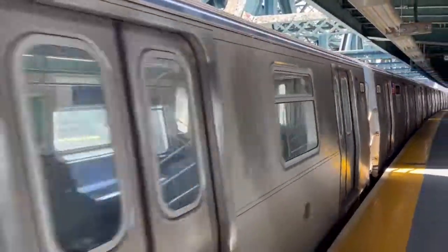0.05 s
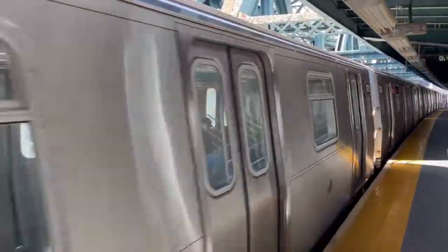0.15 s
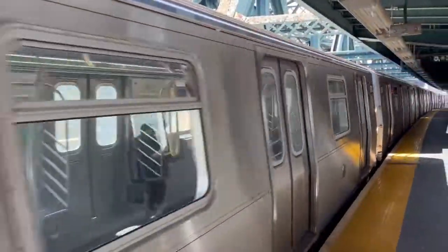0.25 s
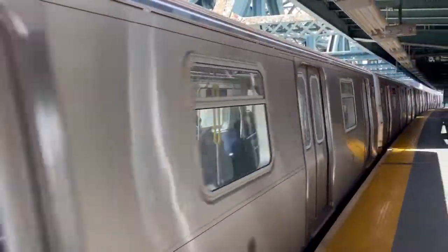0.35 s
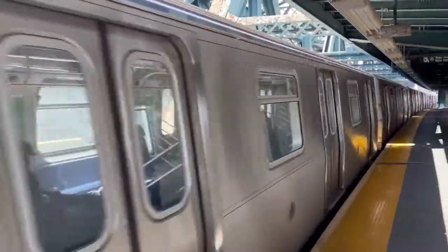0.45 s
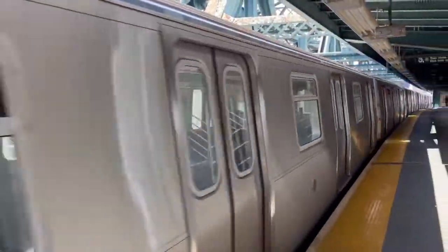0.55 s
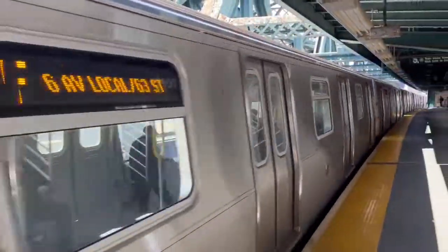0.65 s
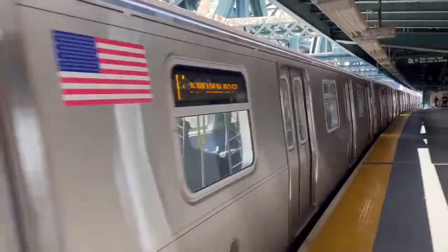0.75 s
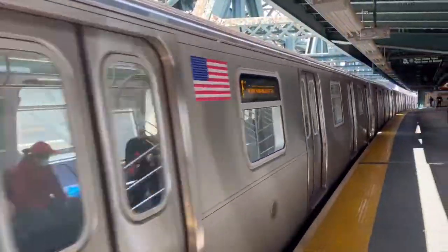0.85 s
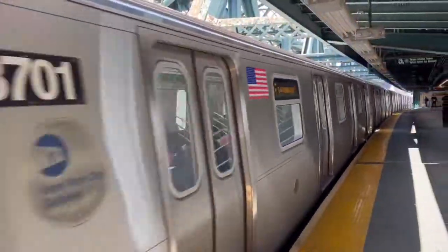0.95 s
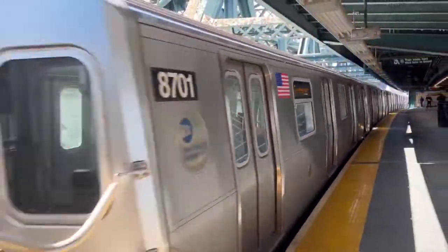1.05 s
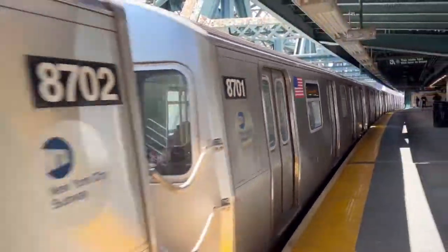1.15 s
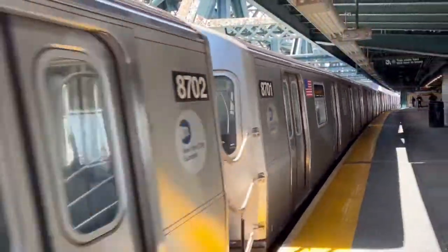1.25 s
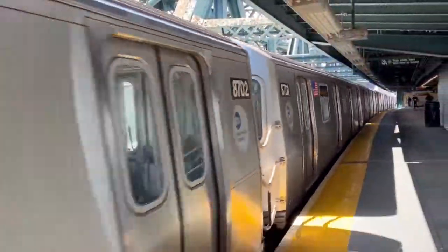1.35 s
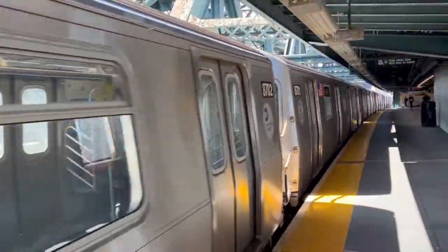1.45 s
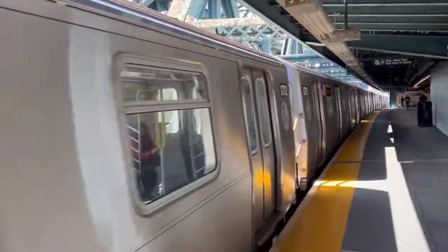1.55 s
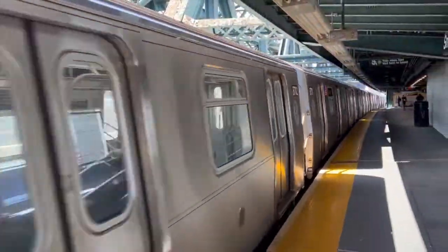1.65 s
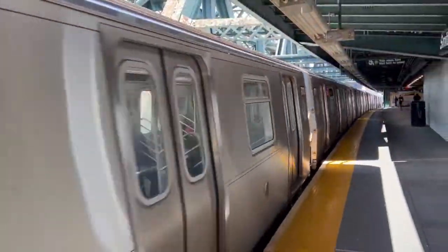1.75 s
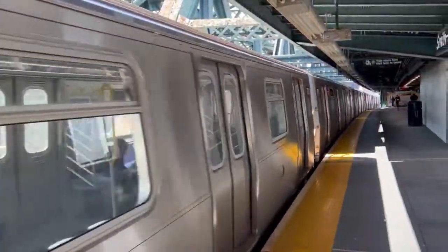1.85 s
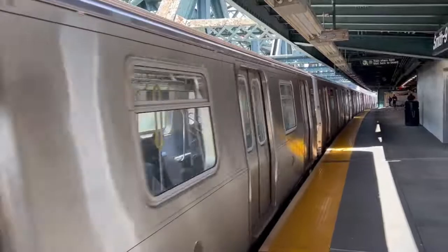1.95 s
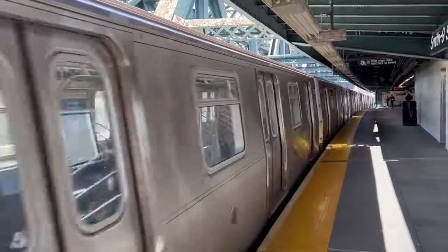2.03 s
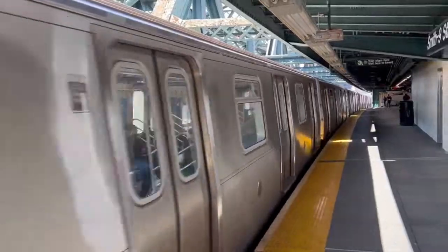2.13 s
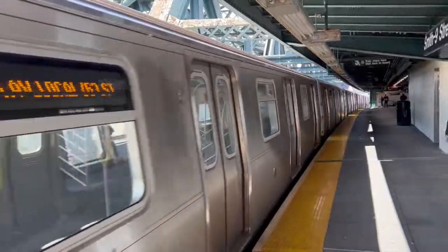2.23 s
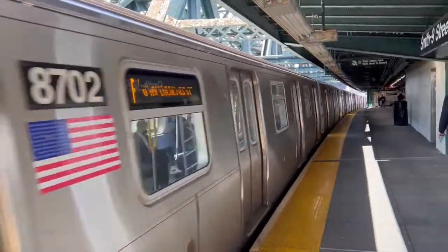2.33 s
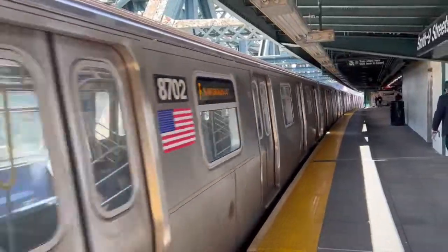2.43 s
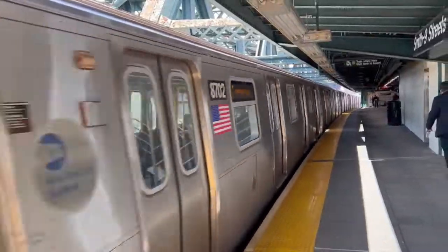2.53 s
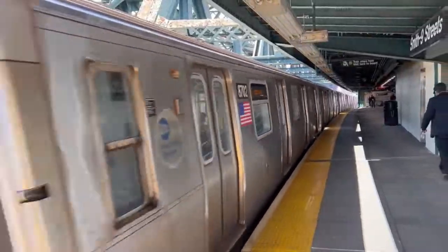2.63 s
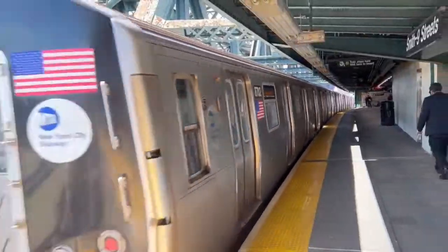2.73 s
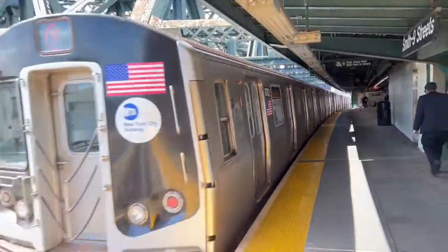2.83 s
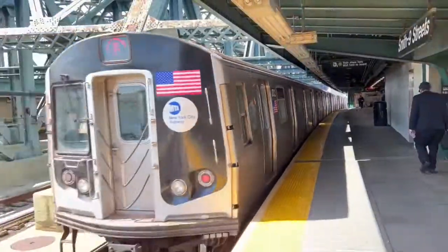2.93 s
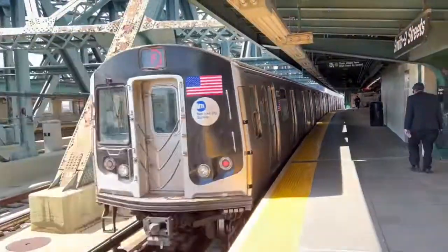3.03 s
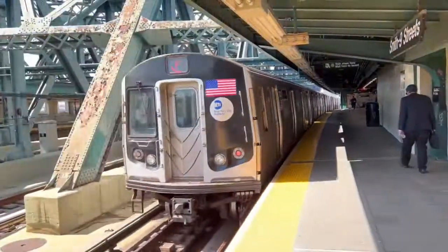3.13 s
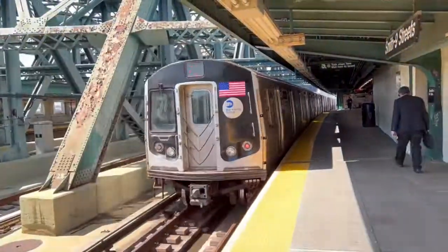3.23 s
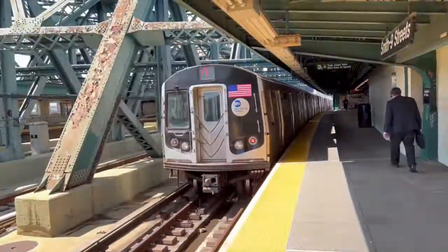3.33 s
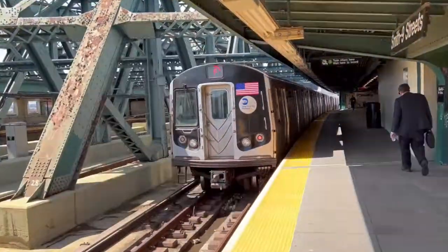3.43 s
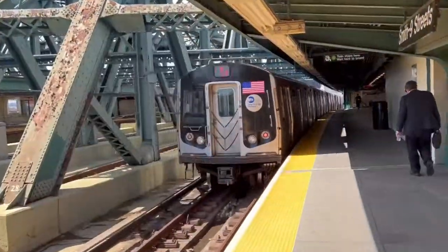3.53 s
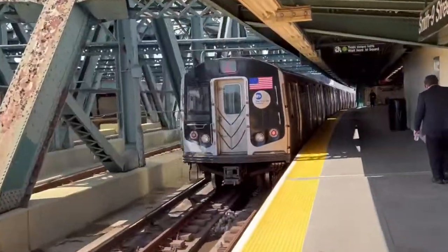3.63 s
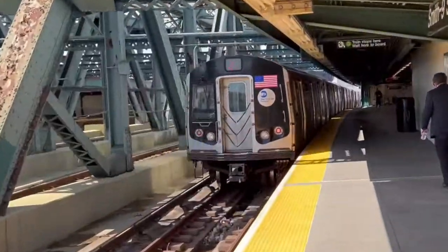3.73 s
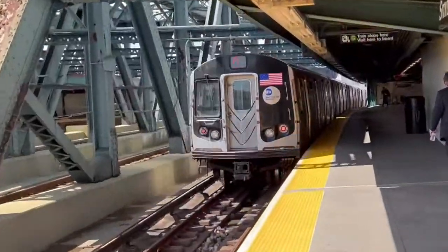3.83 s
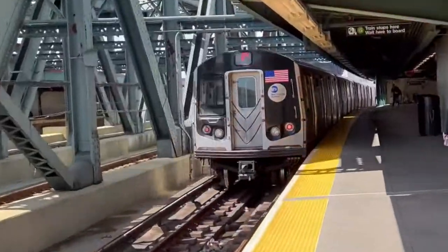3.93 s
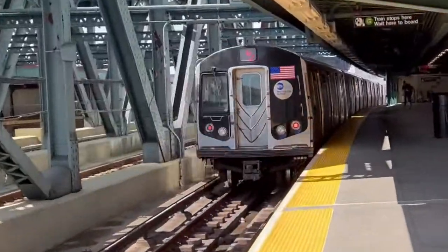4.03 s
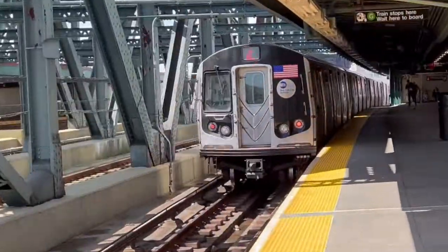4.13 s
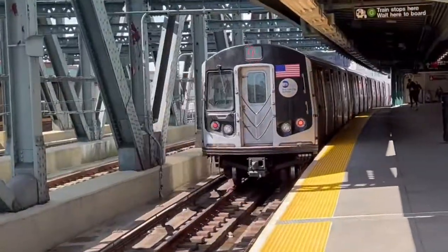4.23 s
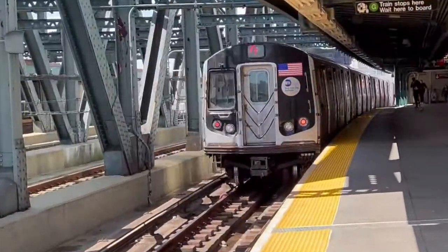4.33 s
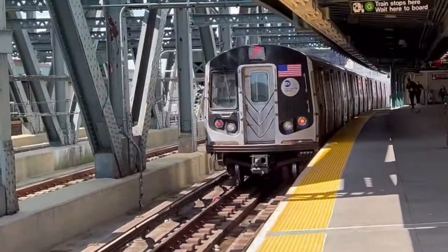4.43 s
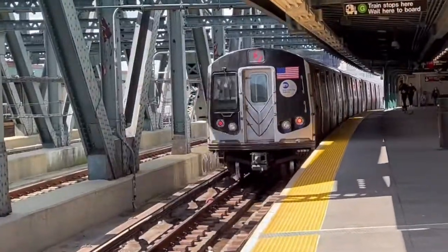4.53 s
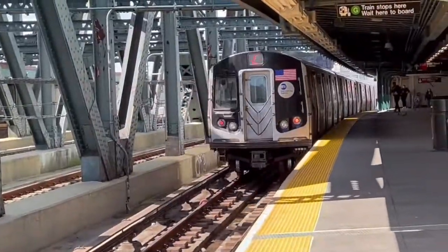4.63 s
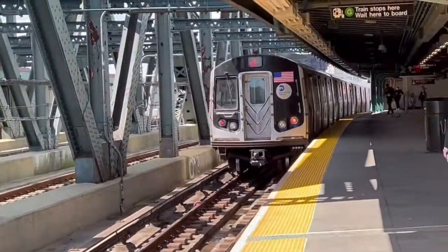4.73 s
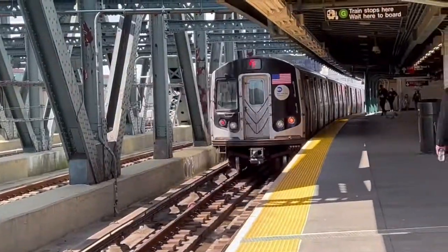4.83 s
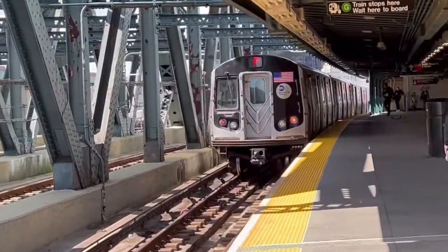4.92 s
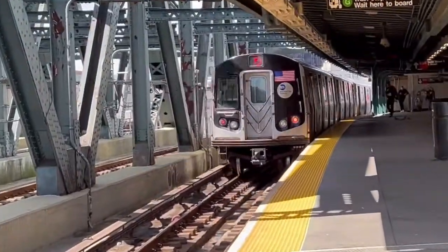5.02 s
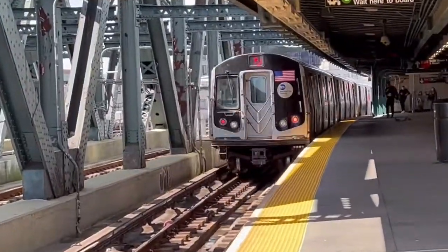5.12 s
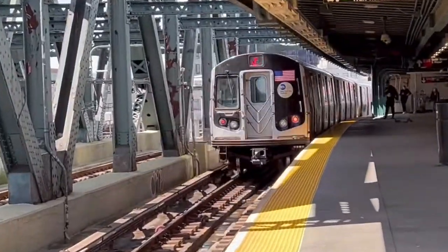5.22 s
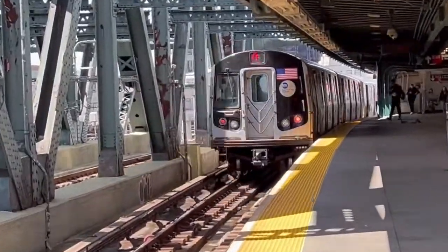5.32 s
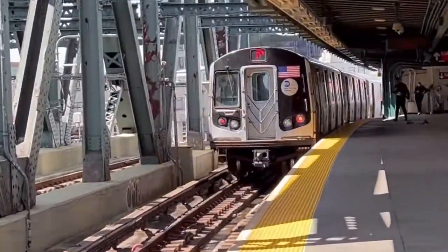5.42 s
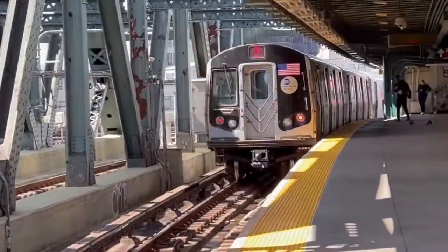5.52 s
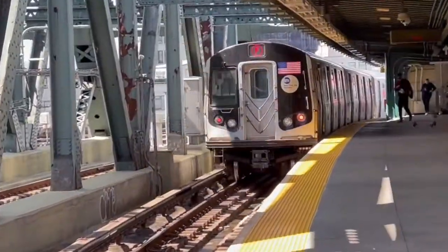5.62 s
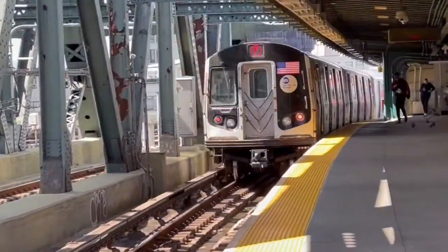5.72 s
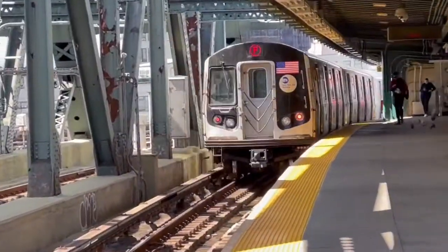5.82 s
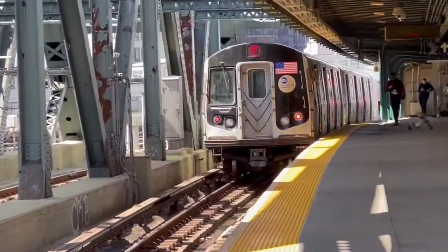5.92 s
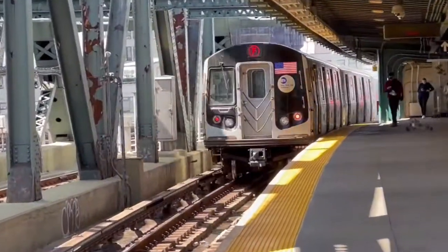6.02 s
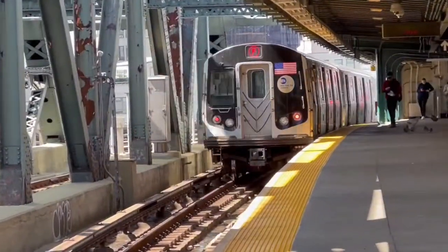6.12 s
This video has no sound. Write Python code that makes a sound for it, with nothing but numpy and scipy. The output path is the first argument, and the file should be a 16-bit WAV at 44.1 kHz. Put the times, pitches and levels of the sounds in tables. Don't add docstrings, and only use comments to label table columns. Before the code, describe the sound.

A metro train rolls closely past a roofed platform on an iron viaduct. Rough wheel roar, booming girders and quick joint knocks fill three seconds, with motor whine and thin flange squeals. As the tail clears, dragged air thumps the phone microphone; the roar falls away, leaving faint squeals and a few distant clanks over a returning low rumble.

```python
import sys
import numpy as np
from scipy import signal
from scipy.fft import rfft, irfft
from scipy.io import wavfile
from scipy.ndimage import uniform_filter1d

SR = 44100
rng = np.random.default_rng(int(sys.argv[2]) if len(sys.argv) > 2 else 0)


def digitize_waveform(pressure):
    field = np.atleast_2d(pressure).T
    bounded = np.clip(field, -1, 1)
    quanta = np.round(bounded * 32767).astype(np.int16)
    wavfile.write(sys.argv[1], SR, quanta)


def boost_factor(decibels):
    exponent = np.asarray(decibels, float) / 20
    return 10 ** exponent


N = 272097
TICK = 44
TIME = np.arange(N // TICK + 2) * TICK / SR
HZ = np.fft.rfftfreq(N, 1 / SR) + 1e-3


def on_log(table, hz):
    table_hz, values = np.transpose(table)
    return np.interp(np.log(hz), np.log(table_hz), values)


def full(curve):
    return np.interp(np.arange(N) / SR, TIME, curve)


def walk(rate):
    k = int(SR / TICK / rate)
    steps = np.repeat(rng.standard_normal(250), k)[:len(TIME)]
    return 1.304 * uniform_filter1d(uniform_filter1d(steps, k), k)


def noise(shape):
    spec = rfft(rng.standard_normal((2, N))) * shape
    return irfft(spec, N) / np.sqrt(np.mean(shape ** 2))


def bell(hz, width):
    return 1 / np.sqrt(1 + (2 * (HZ - hz) / width) ** 2)


def hold(start, length, rise, fall):
    rising = (TIME - start) / rise
    falling = (start + length - TIME) / fall
    return np.clip(np.minimum(rising, falling), 0, 1)


def knock(s, rise, t60):
    age = np.maximum(TIME - s, 0)
    return (1 - np.exp(-age / rise)) ** 2 * boost_factor(-120 * (age / t60) ** 1.215)


def push(at, peak_db, hz, cycles, lag):
    turns = (np.arange(N) / SR - at - np.array([[0], [lag]])) * hz
    return boost_factor(peak_db) * np.cos(2 * np.pi * turns) * np.exp(-(turns / cycles) ** 2)


def rings(table, rise, fall, trim_db):
    out, t = np.zeros((2, N)), np.arange(N) / SR
    part = 0.45 * np.array([[0], [1]])
    for (s, db, hz), turn in zip(table, rng.random((len(table), 2, 1))):
        near = slice(max(int((s - .15) * SR), 0), int((s + .2) * SR))
        age = t[near] - s
        swell = np.exp(-(age / np.where(age < 0, rise, fall)) ** 2 / 2)
        turns = hz * age + turn[0] + part * (turn - .5)
        out[:, near] += boost_factor(db + trim_db) * swell * np.sin(2 * np.pi * turns)
    return out


# time_s, wheel_roar_db, viaduct_shake_db
ROLL = [(0.0, -26.5, -22), (0.3, -26.5, -24.5), (0.62, -26.5, -24), (0.9, -28.5, -24.5),
        (1.5, -27.5, -25.5), (1.94, -27, -24), (2.56, -30, -30), (2.94, -29, -25.5), (3.44, -30.5, -21.5),
        (3.8, -34, -34), (4.16, -37, -43), (4.4, -38, -42), (4.64, -40.5, -31), (5.0, -39.5, -31),
        (5.2, -38.5, -29.5), (5.74, -42, -35), (6.17, -41, -23.5)]


def rolling():
    s, roar, girders = np.transpose(ROLL)
    roar = np.interp(TIME, s, roar)
    change = roar - -27
    bodies = -22.5 + 0.67 * change
    hiss = -39.5 + 0.37 * change - 2.5 * np.minimum(TIME, 3.62)
    return np.array([np.interp(TIME, s, girders), bodies, roar, hiss])


def rattle():
    ticks = rng.exponential(1, len(TIME)) * (rng.random(len(TIME)) < .04)
    return 1.3 * signal.lfilter([1], [1, -.85], ticks - ticks.mean())


# pitch_hz, level_db per Hz
STEEL = [(28, -33), (45, -4.5), (70, -4.5), (150, -5.5), (330, -6.5), (500, -11.5), (1000, -19),
         (2000, -26.5), (3100, -32.5), (3900, -36), (6000, -42.5), (9000, -45.5), (12000, -52.5),
         (15000, -59), (15250, -69), (15700, -70)]
# pitch_hz, width_hz, level_db over the roar
RINGS = [(62, 25, 3), (95, 22, -4), (117, 22, 5), (200, 35, 5), (338, 50, 8), (590, 90, 2), (1130, 120, 2),
         (1650, 150, 2), (2000, 220, 4), (2650, 200, 4), (2950, 250, 4), (3380, 280, 3.5), (4950, 300, 4),
         (5900, 500, 4)]


def steel_colour():
    colour = boost_factor(on_log(STEEL, HZ))
    for hz, width, db in RINGS:
        colour = colour * (1 + (boost_factor(db) - 1) * bell(hz, width) ** 2)
    return colour


def blend(levels, place):
    low = min(int(place), 3)
    return levels[low] + (place - low) * (levels[low + 1] - levels[low])


# pitch_hz, time_to_fade_60_db_s
JOINT_T60 = [(100, 0.13), (400, 0.61), (2000, 0.46), (6000, 0.37), (13000, 0.16)]
# start_s, roar_peak_db, boom_db, hiss_db, clank_hz
JOINTS = [(0.0, -15.5, -7.5, -34, 920), (0.181, -15.5, -10, -30.5, 902), (0.419, -16.5, -10.5, -42, 1063),
          (0.597, -21, -10.5, -32, 910), (0.841, -14.5, -12, -34, 837), (1.019, -19, -11.5, -33, 878),
          (1.206, -19, -7.5, -34, 734), (1.382, -16.5, -10.5, -26.5, 962), (1.645, -19, -12, -34.5, 877),
          (1.826, -21, -8, -31.5, 780), (2.055, -24, -12, -39, 790), (2.23, -20.5, -18, -35, 2026),
          (2.729, -20, -32, -49, 940), (2.822, -15, -14.5, -32.5, 946), (2.998, -13, -12, -30.5, 790),
          (4.279, -35, -18, -66, 940), (4.858, -29, -20.5, -37, 1174), (5.031, -24.5, -20, -35, 1177),
          (5.56, -29, -22.5, -49, 1993), (5.919, -38, -28, -48, 1420), (6.086, -27.5, -23, -52, 843)]


def joint_power(hz, place, zone_db):
    power, t60 = 0, on_log(JOINT_T60, hz)
    for t, roar, boom, hiss, _ in JOINTS:
        top = hiss - 19.5 - 4 * (t > 3.5)
        db = blend(np.array([boom - 12, boom - 10, roar - 7.5, hiss - 4, top + 1.7]) - zone_db, place)
        echoes = knock(t, 0.01, t60)
        crack = 1.2 * knock(t, 0.00038, 0.04)
        power = power + boost_factor(2 * db) * (echoes + crack)
    return power


# start_s, top_peak_db, hiss_db
ZINGS = [(.1775, -52, -50), (.31, -51, -43), (.47, -52, -46), (.66, -55, -55), (1.3823, -52, -50),
         (1.8138, -53, -50), (1.89, -51, -43), (1.94, -56, -38), (2.1, -56, -52), (2.2, -56, -55),
         (2.7257, -62, -55), (2.8135, -56, -55), (2.9981, -54, -50), (1.538, -52, -35), (2.2967, -52, -49),
         (3.278, -57, -50), (3.454, -52.5, -43.5), (3.693, -53, -44), (3.8636, -50, -45),
         (4.8055, -57, -48), (4.9686, -52.5, -44)]


def zing_power(place, zone_db):
    power = 0
    for t, top, hiss in ZINGS:
        db = blend(np.array([-120, -120, hiss - 22, hiss - 3, top + 1.3]) - zone_db, place)
        power = power + boost_factor(2 * db) * (knock(t, 0.011, 0.45) + 1.3 * knock(t, .0006, .04))
    return power


# low_hz, high_hz
ZONES = [(35, 140), (160, 500), (700, 3500), (4500, 8500), (11000, 15000)]


def wheels():
    colour = steel_colour()
    zone_power = [np.sum(colour[(HZ > lo) & (HZ < hi)] ** 2) / len(HZ) for lo, hi in ZONES]
    zone_db = 10 * np.log10(zone_power)
    centres = np.log([np.sqrt(lo * hi) for lo, hi in ZONES])
    roll = rolling() - zone_db[:4, None]
    roll = np.vstack([roll, roll[3] - 1 - 0.68 * TIME])
    spec = rfft(rng.standard_normal((2, N))) * colour
    out, shake, chatter = 0, walk(9), rattle()
    spacing = .45
    for k in np.arange(-11, 10):
        hz = 1000 * 2 ** (k * spacing)
        place = np.interp(np.log(hz), centres, np.arange(5))
        treble = max(place - 2, 0)
        flutter = 1.35 * walk(14) / max(place - 2, 1)
        power = boost_factor(2 * (blend(roll, place) + 0.89 * shake + flutter + treble / 2 * chatter))
        power = power + joint_power(hz, place, zone_db) + zing_power(place, zone_db)
        window = np.cos(np.pi / 2 * np.clip(np.log2(HZ / hz) / spacing, -1, 1)) ** 2
        out = out + full(np.sqrt(power)) * irfft(spec * window, N)
    return out


# pitch_hz, level_db, time_to_fade_60_db_s
THUD = [(150, -4, .2), (203, 1, .3), (265, -3, .16), (335, 0, .24), (410, -4, .14)]


def strikes():
    out, age = np.zeros((2, N + SR)), np.arange(SR // 2) / SR
    chance = rng.standard_normal((len(JOINTS), 2, 2, 10))
    for (t, roar, boom, _, clank_hz), (tune, turn) in zip(JOINTS, chance):
        modes = [(hz, boom + db - 15.5, t60) for hz, db, t60 in THUD]
        modes += [(clank_hz * (1 + .045 * k), roar - 10, .22) for k in range(-2, 3)]
        hz, db, t60 = np.transpose(modes)[:, :, None]
        detuned_hz = hz * (1 + 0.0286 * tune[..., None])
        ring = np.sin(2 * np.pi * detuned_hz * age + 9 * turn[..., None])
        ring = ring * boost_factor(db - 60 * age / t60) * (1 - np.exp(-age / 0.0069))
        first = int(t * SR)
        out[:, first:first + len(age)] += ring.sum(axis=1)
    return out[:, :N]


ORDER_DB = [-45, -56, -58]
ORDER_FADE = [0, -0.2, 15]
# start_s, length_s, order, level_db
SWELLS = [(2.42, .45, 1, -37), (3.1, .2, 1, -37), (3.27, .04, 1, -32), (3.42, .05, 1, -32),
          (3.62, .14, 1, -32), (3.8, .1, 1, -38), (4.2, .03, 1, -36), (4.28, .03, 1, -37),
          (4.45, .04, 1, -39), (2.6, .95, 2, -44), (3.7, .7, 2, -50), (4.98, .04, 2, -40),
          (5.3, .12, 2, -50), (3.15, .1, 3, -39), (3.26, .02, 3, -41), (3.3, .1, 3, -40), (3.4, .1, 3, -40),
          (3.55, .05, 3, -43), (3.62, .03, 3, -41), (4.2, .18, 3, -54)]


def whine(order):
    power = boost_factor(2 * (ORDER_DB[order - 1] - ORDER_FADE[order - 1] * TIME))
    rise, fall = 0.018, 0.11
    for start, length, which, db in SWELLS:
        if which == order:
            gain = boost_factor(db) * hold(start - rise / 2, length + fall, rise, fall)
            power = power + gain ** 2
    return np.sqrt(power)


def motors():
    motor_hz = 563.5 * (1 + .003 * walk(25))
    phase = 2 * np.pi * np.cumsum(full(motor_hz)) / SR
    out, beat = 0, bell(0, 50) ** 2
    for k, gain in enumerate([whine(order=1), whine(order=2), whine(order=3), whine(order=3) / 3], 1):
        steady = .8 * (k >= 3)
        rough = .8 - steady / 2
        band = (steady + rough * noise(beat)) * np.cos(k * phase)
        band = band + rough * noise(beat) * np.sin(k * phase)
        out = out + band * full(gain)
    return out


# start_s, length_s, pitch_hz, width_hz, level_db
SQUEALS = [(0, 3.47, 8430, 220, -59), (2.2, .2, 6080, 260, -51), (1.2, .2, 4940, 160, -47),
           (1.38, .12, 6170, 700, -42), (.55, .85, 2830, 300, -40), (3.03, .19, 4930, 220, -53),
           (3.24, .22, 5430, 550, -50), (3.7, 1.15, 7200, 140, -66), (4.87, .1, 7030, 120, -56),
           (5.1, .4, 7190, 140, -67), (4.08, .26, 5085, 220, -61), (4.53, .27, 9080, 260, -66),
           (5.21, .23, 6105, 380, -58), (5.55, .28, 5080, 340, -54), (5.6, .22, 5180, 420, -55),
           (5.75, .2, 5170, 300, -61), (3.4, .8, 7200, 900, -60), (5.58, .32, 10140, 300, -68),
           (6.02, .28, 10190, 300, -80), (5.45, .4, 9100, 260, -69)]
# start_s, end_s, level_db
FAR_HISS = (5, 6, -69)


def squeals():
    out = 0
    for start, length, hz, width, first_db in SQUEALS:
        weaken = 1.5 * np.clip((TIME - start) / length, 0, 1)
        db = first_db - weaken + 1.5 * walk(16)
        tone = noise(np.exp(-((HZ - hz) / (.6 * width)) ** 2))
        out = out + full(hold(start, length, .04, .08) * boost_factor(db)) * tone
    start, end, db = FAR_HISS
    swell = np.sin(np.pi * np.clip((TIME - start) / (end - start), 0, 1))
    return out + full(swell * boost_factor(db)) * noise(bell(14600, 3000) ** 2)


# peak_s, level_db, pitch_hz
BOOMS = [(0.03, -31, 62), (0.04, -27, 192), (0.04, -17, 366), (0.201, -11.5, 202), (0.234, -13, 339),
         (0.289, -14.5, 122), (0.459, -19, 177), (0.474, -16.5, 354), (0.883, -18.5, 184),
         (0.888, -21.5, 62), (0.918, -20, 350), (1.058, -19, 341.5), (1.222, -17, 149), (1.232, -22, 199),
         (1.237, -17, 348), (1.247, -24, 62), (1.407, -28, 59), (1.417, -15, 192), (1.447, -11.5, 340.5),
         (1.666, -22.2, 53.4), (1.881, -18, 198), (1.911, -16, 116), (2.26, -20.5, 360), (2.29, -18, 185),
         (2.385, -19, 358), (2.589, -21.5, 70), (2.689, -19, 66), (2.724, -22, 347), (2.834, -18, 66.6),
         (2.834, -25, 218), (2.849, -23, 335), (3.014, -30, 306), (3.018, -19.5, 65), (3.018, -17.5, 108),
         (3.018, -13, 209), (3.617, -25, 152), (3.627, -21, 100), (3.671, -19, 70), (3.991, -21.5, 163),
         (4.011, -28, 81), (4.056, -20, 365), (4.061, -26, 135), (4.081, -28, 58), (4.121, -24.5, 377),
         (4.605, -35, 105), (4.924, -20, 75), (4.995, -23, 73), (5.055, -26.2, 67), (5.063, -21, 305),
         (5.073, -21.5, 160), (5.123, -26.5, 171), (4.45, -31, 60), (4.7, -28, 72), (5.47, -28, 55),
         (5.8, -31, 62), (5.363, -22, 74.5), (5.632, -22.5, 66.5), (5.933, -23, 95), (6.051, -27.9, 70),
         (6.136, -27, 60)]


def booms():
    return rings(BOOMS, rise=0.013, fall=0.028, trim_db=-3)


# peak_s, level_db, pitch_hz
BLOWS = [(0.18, -11, 350), (0.28, -17, 260), (0.47, -8, 300), (1.4194, -9, 220), (1.8278, -8, 250),
         (1.8275, -18, 800), (2.828, -12, 230), (4.3, -20, 1100), (2.846, -12, 300), (3.004, -10.5, 270),
         (3.0045, -15, 1100), (3.0239, -12, 190), (5.0432, -23, 400), (5.0626, -16, 290)]


def blows():
    return -sum(push(s, db, hz, cycles=0.77, lag=0) for s, db, hz in BLOWS)


# peak_s, level_db, pitch_hz
CLANKS = [(1.385, -43, 7600), (1.417, -37, 4070), (1.43, -27, 800), (1.454, -38, 4059), (1.48, -39, 4000),
          (1.459, -32, 3260), (1.494, -30, 1949), (1.83, -34, 2570), (2.844, -34.6, 2680),
          (2.846, -44, 4070), (2.842, -19, 347), (3.007, -16.5, 331), (3.008, -30, 530), (3.03, -27, 870),
          (3.045, -28, 644), (5.0, -41, 1360), (5.015, -40, 1160), (3.006, -40, 3725), (3.008, -33, 1830),
          (3.011, -41, 2929), (3.013, -36, 3300), (3.013, -30, 1960), (3.018, -23.8, 780),
          (3.023, -31, 2590), (3.033, -28, 1497), (3.046, -27, 1314), (3.056, -32.7, 1960),
          (5.041, -46, 2880), (5.041, -39, 1184), (5.044, -36, 3165), (5.046, -38, 1820),
          (5.065, -39, 1480), (5.075, -34, 1000), (5.14, -39, 1050), (5.572, -40, 1930), (5.038, -40, 3380),
          (5.57, -50, 3900), (4.875, -46, 3300), (4.9, -44, 2000), (4.92, -45, 3400), (5.06, -40, 2600),
          (5.085, -44, 3200), (3.04, -28, 714), (3.07, -35, 1700), (3.06, -32, 1090), (1.838, -35, 3300),
          (1.878, -32, 2690), (1.876, -36, 3400), (2.83, -34, 1020), (2.86, -30, 950)]


def clanks():
    return rings(CLANKS, rise=0.0056, fall=0.0091, trim_db=0)


# start_s, length_s, from_hz, to_hz, level_db
SCRAPES = [(5.5, .07, 1900, 1900, -49), (4.81, 0.072, 1060, 1000, -40), (5.03, 0.07, 1100, 900, -38),
           (4.99, 0.067, 1300, 1400, -38.5), (4.82, 0.063, 1930, 2100, -38), (5.565, .2, 5110, 5170, -59),
           (5.59, 0.2, 4600, 5500, -61), (5.5, .1, 6500, 6700, -61), (4.87, 0.026, 4800, 2750, -48),
           (3.3, 0.118, 2000, 2500, -49), (3, .06, 2800, 2300, -46)]


def scrapes():
    out = 0
    for start, length, from_hz, to_hz, db in SCRAPES:
        hz = from_hz + (to_hz - from_hz) * np.clip((TIME - start) / length, 0, 1)
        phase = 2 * np.pi * np.cumsum(full(hz)) / SR
        rough = .6 + .8 * noise(bell(0, 110) ** 2)
        out = out + full(boost_factor(db) * hold(start, length, .012, .02)) * rough * np.sin(phase)
    return out


# start_s, length_s, level_db
GUST = [
    (3.04, 0.59, -20),
    (3.56, 0.8, -39.5),
]
# peak_s, level_db, pitch_hz
SLAPS = [(3.115, -14, 110), (3.128, -14, 120), (3.234, -12, 170), (3.141, -9, 95), (3.154, -7, 170),
         (3.184, -7, 95), (3.196, -8, 110), (3.212, -12, 80), (3.226, -12, 130), (3.247, -6, 120),
         (3.2583, -4, 330), (3.2625, -8, 170), (3.275, -13, 100), (3.288, -13, 120), (3.3296, .5, 250),
         (3.3225, -12, 90), (3.17, -12, 130), (3.3, -14, 120), (3.36, -16, 100), (3.334, -9, 230),
         (3.381, -12, 110), (3.4, -14, 55), (3.412, -11, 150), (3.612, -13, 150), (3.632, -13, 170)]


def gust():
    puffs = sum(boost_factor(db) * hold(start, length, 0.16, 0.36) for start, length, db in GUST)
    flow = noise(bell(85, 190) ** 1.7 * HZ / (HZ + 60)) * full(puffs * boost_factor(2.5 * walk(30)))
    wind = flow[0] + 0.69 * flow[1] * np.array([[1], [-1]])
    for at, peak_db, hz in SLAPS:
        wind = wind + push(at, peak_db, hz, cycles=0.43, lag=0.00043)
    return wind * boost_factor(np.array([[.8], [-.8]]))


# peak_s, level_db, pitch_hz
SURGES = [(3.185, -42, 1660), (3.22, -42, 1670), (3.258, -35, 1730), (3.288, -32, 1680), (3.355, -42, 1700),
          (3.42, -41, 1650), (3.455, -40, 1680), (3.492, -33, 1740), (3.512, -34, 1710), (3.68, -40, 1690),
          (3.702, -35, 1680), (3.295, -45, 2200), (3.385, -42, 2240), (3.405, -42, 2300), (3.47, -36, 2220),
          (3.495, -44, 2500), (3.405, -37, 1310), (3.57, -44, 2280), (3.65, -48, 2250), (3.7, -43, 2820),
          (3.72, -43, 2820), (3.68, -47, 2790)]


def surges():
    return rings(SURGES, rise=0.0066, fall=0.011, trim_db=0)


# pitch_hz, phase_radians
LEAD = [(0, 0), (900, .5), (1600, -.25), (3400, .55), (5800, -.4), (7400, 0), (9600, -2.8), (11900, -4.8),
        (12500, -6), (14200, -6.6), (14600, -7.5), (15600, -8.6)]


def ports(pair, like, left_db):
    a, b = rfft(pair)
    same = np.clip(on_log(like, HZ), 0, 1)
    tilt = boost_factor(on_log(left_db, HZ) / 2)
    lead = np.interp(HZ, *np.transpose(LEAD))
    right = same * a * np.exp(-1j * lead) + np.sqrt(1 - same ** 2) * b
    return irfft(np.array([a * tilt, right / tilt]), N)


# pitch_hz, likeness_0_to_1
LIKE_WIDE = [(60, 0.97), (300, 0.88), (700, 0.054), (2400, 0.13), (5500, 0.046), (8000, 0.71), (9300, 0.96),
             (10800, 0.84), (12000, 0.86), (12500, 0.91), (14300, 0.92), (15000, 0.8)]
LIKE_FOCUS = [(60, 1), (500, 0.91), (1100, 0.68), (1900, 0.99), (2600, 0.99), (4500, 0.83), (6300, 0.99),
              (7500, 0.95), (8300, 0.99), (9600, 1), (12000, 0.77), (14300, 0.64), (15000, 0.7)]
# pitch_hz, level_db
LEFT_WIDE = [(60, 1.5), (700, 3), (1500, 2), (2300, 0), (4000, 2.5), (5500, 6), (8500, 0), (15000, -0.5)]
LEFT_FOCUS = [(60, 1), (400, 1.5), (700, 6), (1500, 2.5), (2100, -0.5), (15000, 0)]


def scene():
    train = wheels() + strikes() + motors() + squeals() + booms() + clanks() + scrapes() + surges()
    focus = full(np.clip((TIME - 3.56) / 0.48 + .5, 0, 1))
    wide = ports(train, LIKE_WIDE, LEFT_WIDE)
    focused = ports(train, LIKE_FOCUS, LEFT_FOCUS)
    return (1 - focus) * wide + focus * focused + gust() + blows()


def top_cut(x):
    return signal.sosfilt(signal.butter(12, 15700, fs=SR, output="sos"), x)


def record(dry):
    bass_cut = signal.butter(2, 34, "high", fs=SR, output="sos")
    cut = signal.sosfilt(bass_cut, dry)
    rounded = np.tanh(0.59 * cut) / 0.6
    return top_cut(rounded)


dry = scene()
out = record(dry)
digitize_waveform(out)
```